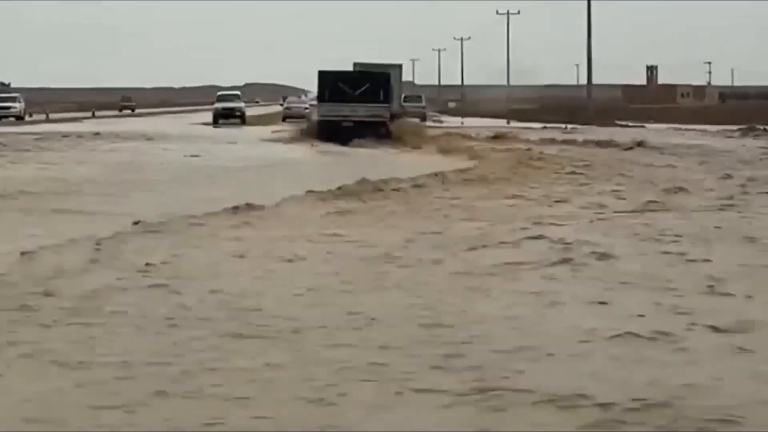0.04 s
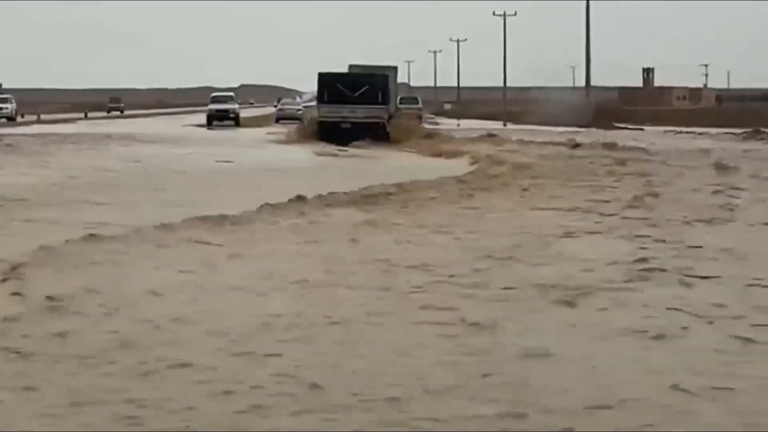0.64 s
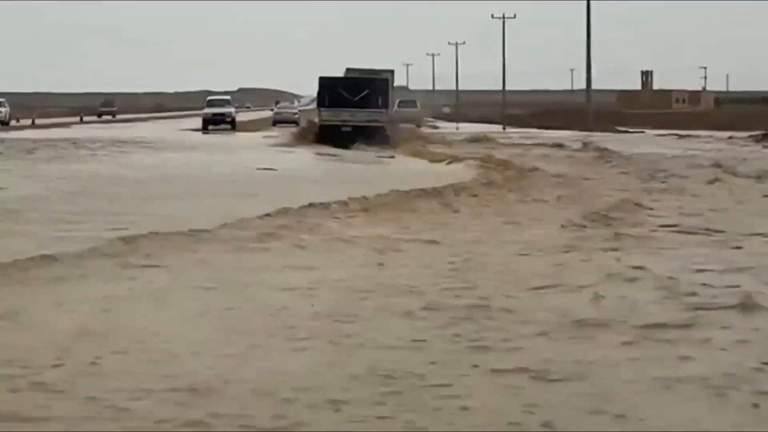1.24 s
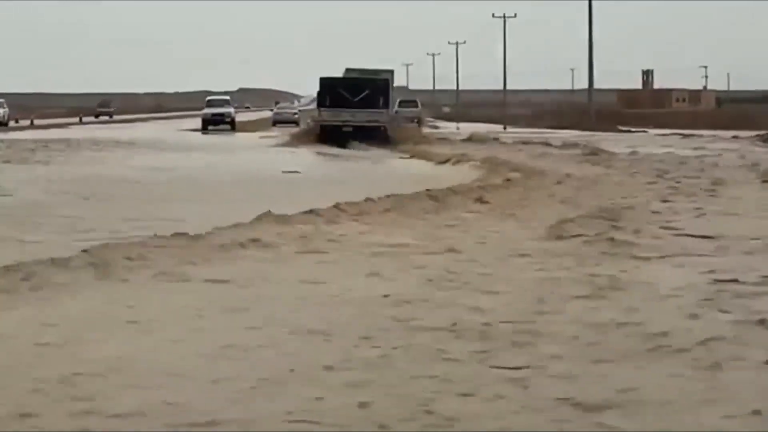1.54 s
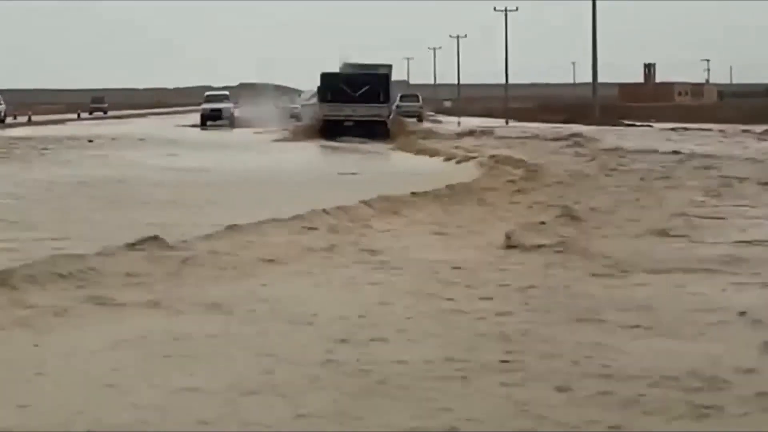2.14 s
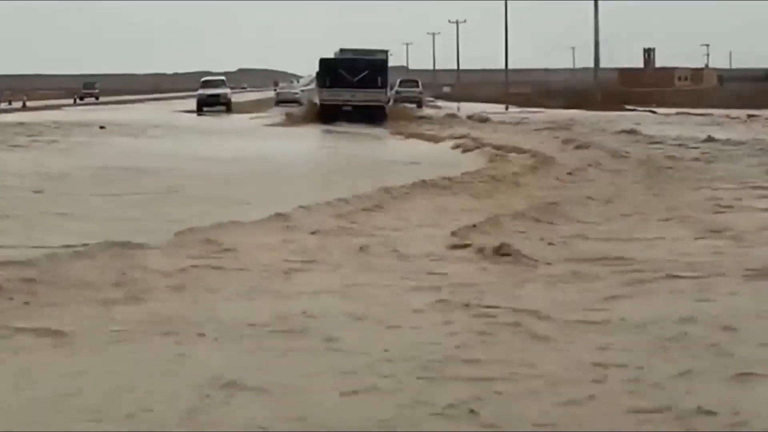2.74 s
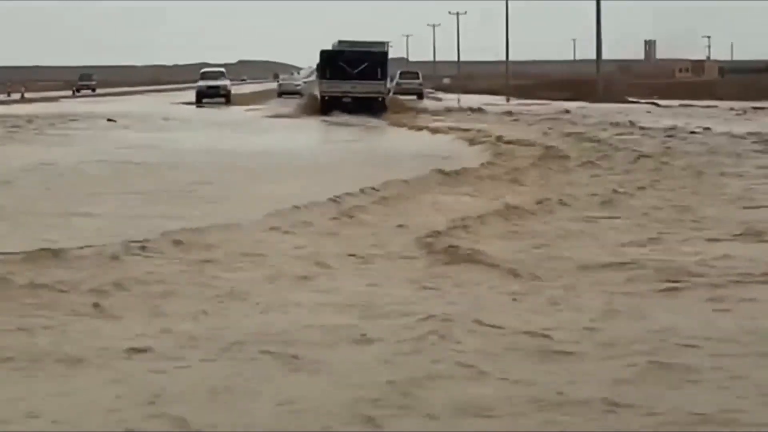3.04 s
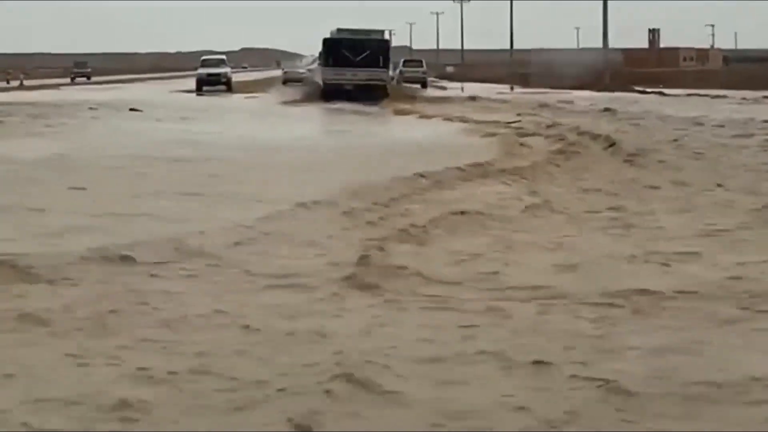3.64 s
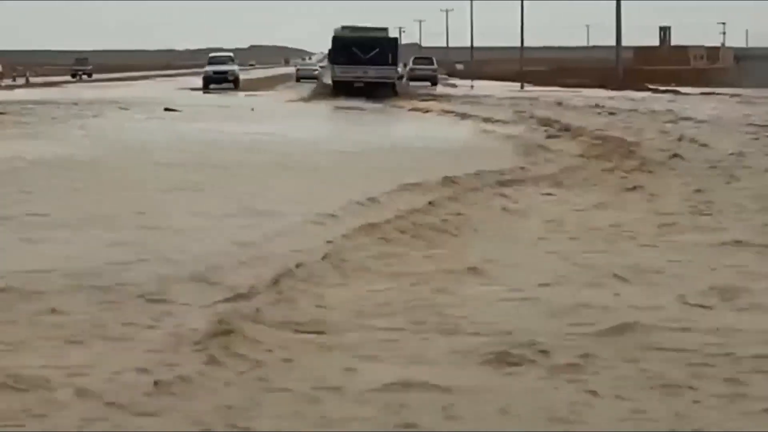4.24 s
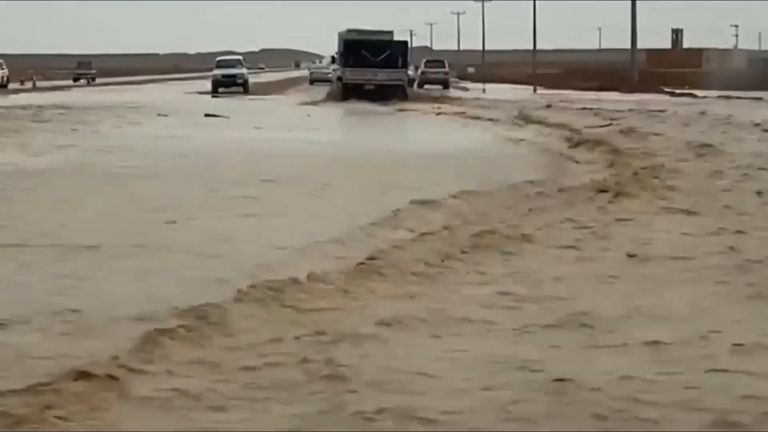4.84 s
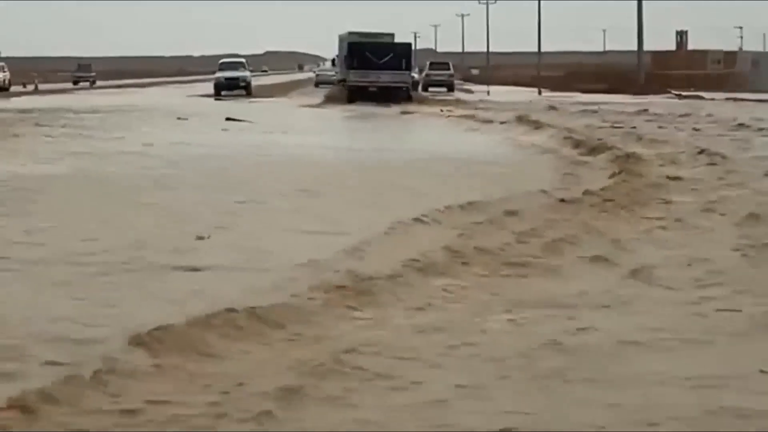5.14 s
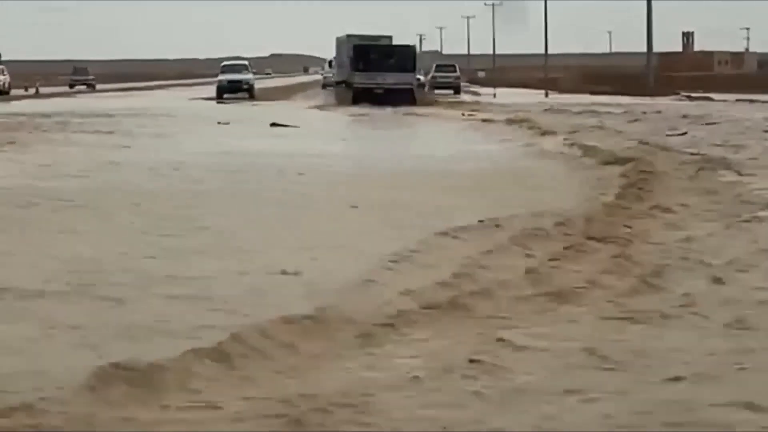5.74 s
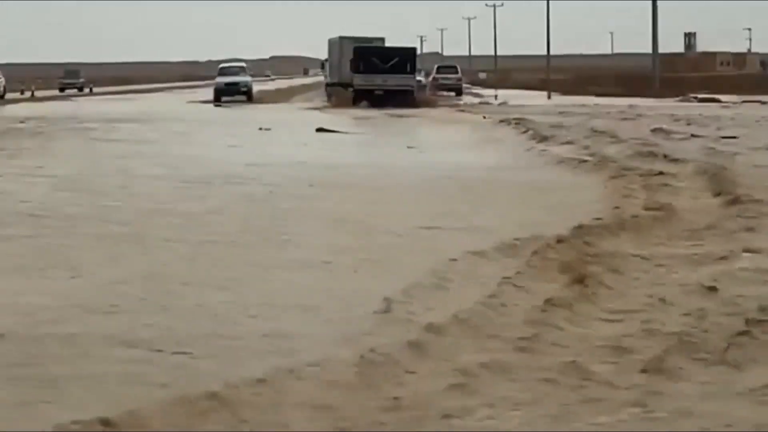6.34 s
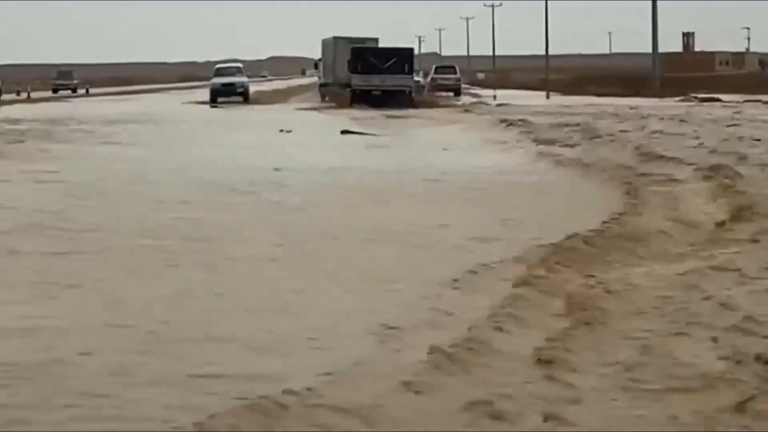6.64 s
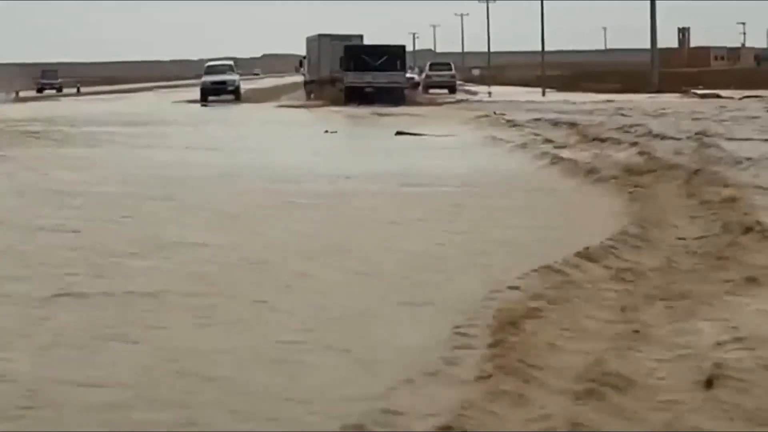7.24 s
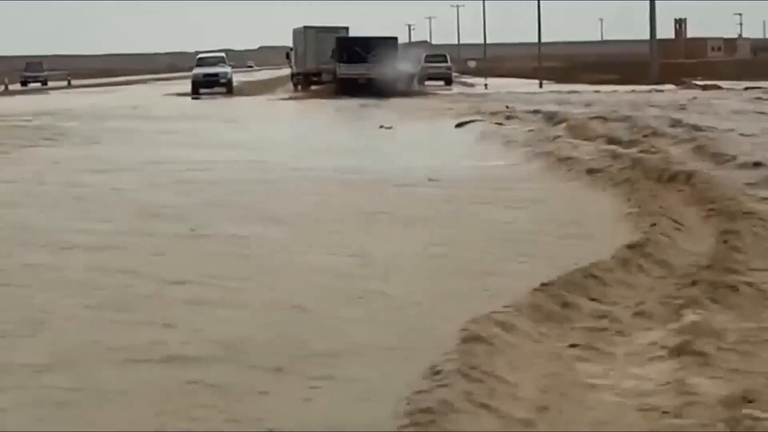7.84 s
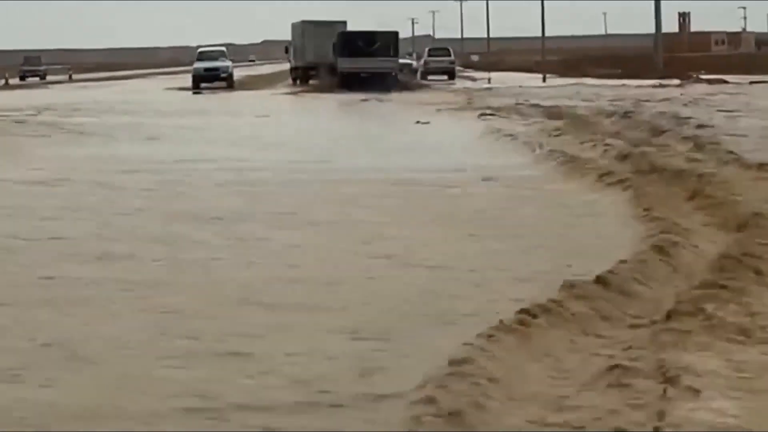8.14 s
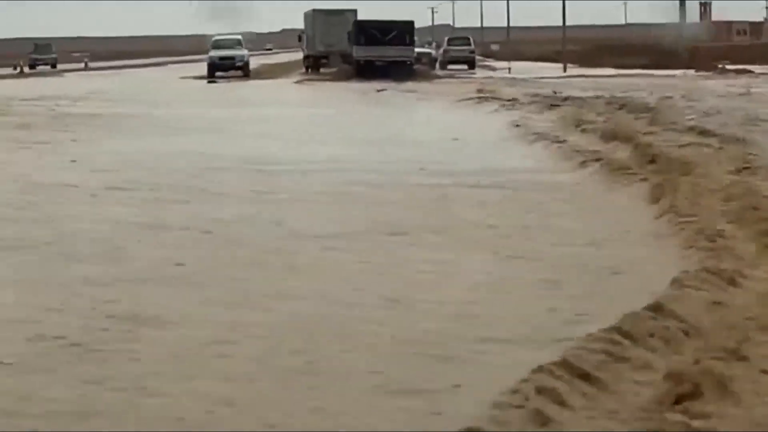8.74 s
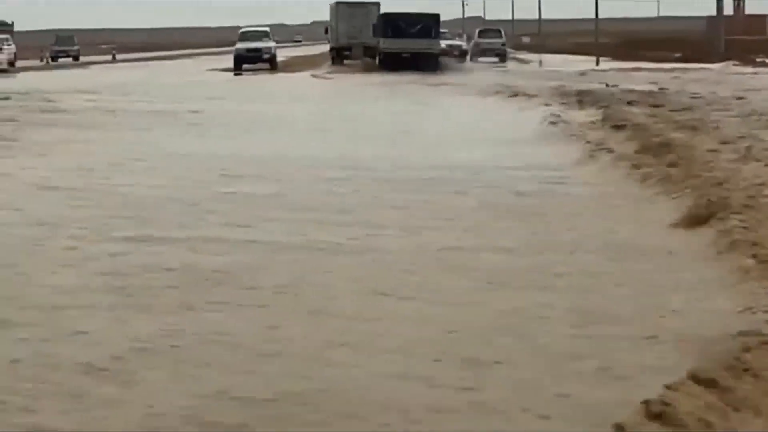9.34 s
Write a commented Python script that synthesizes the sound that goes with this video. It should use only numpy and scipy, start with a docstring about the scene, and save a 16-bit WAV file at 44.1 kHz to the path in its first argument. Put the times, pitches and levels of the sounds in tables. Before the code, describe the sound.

Rushing floodwater is heard throughout from the open window of a car wading along a road. The wash gurgles and fizzes across both sides, while a low engine drone and a heavy, buffeting wind rumble sit in the middle. It starts moderately loud, with deep puffs of wind on the microphone in the first two seconds and occasional light slaps of water. Brief low gulps sound right at the start and at about 3.6 and 4.1 seconds. From around 3.5 to 5.5 seconds the engine opens up, rising slightly in pitch, and the water and wind swell with it. The wave takes on a hollow, throaty tone from about 4.5 seconds. The strongest gusts hit between 5 and 7 seconds. The water then stays loud, with surges of spray and small splashes near 6.6, 7.4 and 8.5 seconds, continuing until the end just past 9 seconds.

```python
"""Rushing water and a low drone come through the open window of a car wading along a flooded road.
As the engine picks up speed, the bow wave grows louder: turbulence gives its wash, ringing bubbles
its gurgle and fizz, and single slaps of water its splashes. The engine sounds harmonics of its
firing rate. Wind buffets the window with a low rumble, the same in both ears."""
import sys
import numpy as np
from scipy import signal
from scipy.fft import rfft, irfft, next_fast_len
from scipy.io import wavfile
from scipy.ndimage import uniform_filter1d, map_coordinates

SR = 44100
rng = np.random.default_rng(int(sys.argv[2]) if len(sys.argv) > 2 else 0)


def wav_record(signal):
    """Record a signal, one row per channel, as 16-bit PCM in the file named by sys.argv[1]."""
    frames = np.transpose(np.atleast_2d(signal))
    bounded = np.clip(frames, -1, 1)
    # unit amplitude maps onto the largest positive 16-bit level
    quanta = np.round(bounded * 32767).astype(np.int16)
    wavfile.write(sys.argv[1], SR, quanta)


N = 413658

# How hard the car pushes the water. Each row: time in seconds, push in dB (0 at cruising speed).
WATER_PUSH = [(0, -6), (1.6, -4.7), (3.1, -2.5), (4.1, -1.87), (5.3, -0.06), (5.9, 0.5), (6.4, 0), (7.8, 0),
              (8.6, 0.2), (9.38, -0.75)]
# The bow wave slops over. Each row: peak time and width in seconds, wash and spray lifts in dB.
WAVE_SURGES = [(.4, 0.33, -0.5, 1), (1.38, 0.13, 0.5, 1.3), (2.15, 0.26, .5, 0.5), (2.8, .12, -1.3, 2),
               (3.5, 0.2, 1.5, 2), (4.1, .27, -0.5, .4), (4.68, 0.17, -0.5, 2.5), (5.38, 0.26, 1.5, 1.5),
               (5.83, 0.39, 0, 1.8), (6.62, 0.26, 0.7, 3.5), (7.4, 0.55, 0.1, 3), (8.03, 0.092, 0, 1.2),
               (8.52, 0.25, 1.5, 2), (8.88, 0.26, 0.8, 2.5), (9.25, .25, 0.5, .8)]
# Slaps of water. Each row: start and decay time in seconds, pitch in Hz, width in octaves, level in dB.
WATER_SLAPS = [(0.209, 0.087, 790, .25, -40), (0.672, .06, 1280, .3, -39), (1.308, 0.085, 1600, 0.55, -41),
               (2.068, 0.073, 1290, .3, -42), (2.818, 0.05, 1280, .3, -33), (3.148, 0.076, 794, 0.22, -35),
               (3.21, .07, 1000, .3, -40), (3.481, .12, 620, .7, -36), (3.928, .07, 2130, .3, -41),
               (4.155, 0.087, 2100, .3, -40.5), (4.44, 0.11, 358, .4, -29), (4.622, .07, 1290, 0.25, -34),
               (4.925, 0.072, 1300, .3, -39), (5.17, 0.068, 790, .3, -32), (5.691, 0.11, 290, 0.49, -29),
               (5.331, 0.11, 1310, .3, -34), (6.147, 0.12, 790, .25, -37), (6.344, 0.069, 780, .25, -31),
               (6.54, .14, 2100, 1.8, -33), (6.63, .09, 885, .5, -31), (6.74, 0.058, 1310, .3, -32),
               (7.301, 0.069, 1300, .3, -32), (7.319, 0.052, 2000, .4, -40), (7.48, 0.087, 2100, 1.1, -31),
               (8.007, .07, 1610, .6, -35), (8.52, .08, 2800, 1, -36), (8.96, .07, 566, 0.36, -33),
               (9.168, .06, 1600, 1.5, -33)]
# Trapped air. Each row: start in seconds, pitch in Hz, level in dB, seconds to fall by 60 dB.
AIR_POCKETS = [(.155, 349, -15, 0.07), (3.609, 175, -14, 0.12), (4.14, 175, -12, 0.15)]

# Noise spectra of water, car body and wind. Each row: frequency in Hz, relative density in dB.
WASH_SPECTRUM = [(120, -20), (260, -1), (400, 2.5), (520, -1), (620, -3), (1000, -6), (1600, -4.5),
                 (2200, -9.5), (3200, -14.5), (5500, -24), (15000, -58)]
CREST_SPECTRUM = [(900, -8), (1130, -8), (1250, 4.5), (1370, -1.5), (1550, -8), (2000, -36), (4000, -80)]
SPRAY_SPECTRUM = [(800, -11), (2000, 5.5), (3200, 1.1), (4300, -0.8), (5500, 0), (8000, -3), (11500, -5.5),
                  (15500, -10)]
FROTH_SPECTRUM = [(300, 0), (1500, 8), (6000, -26)]
CHURN_SPECTRUM = [(50, -43), (90, -4.5), (140, 1.5), (190, -4), (250, -7), (350, -12), (600, -26),
                  (2000, -45), (6000, -100)]
SHUDDER_SPECTRUM = [(30, -30), (60, -0.5), (75, 2), (125, 0.5), (170, -7.5), (260, -16), (700, -91)]
BUFFET_SPECTRUM = [(10, -30), (20, -10), (30, -6), (42, 1), (54, 1.5), (66, 7.5), (76, 6), (87, -3),
                   (110, -7.5), (160, -15), (250, -28.5), (400, -42), (900, -120)]
PUFF_SPECTRUM = [(12, -30), (27, -2), (36, -5), (46, -5), (65, -21), (150, -23), (260, -43), (700, -120)]

# Engine speed. Each row: time in seconds, firings per second.
FIRING_RATE = [(0, 24.9), (.85, 25.25), (1.4, 25.95), (2.4, 26.05), (2.8, 25.65), (3.42, 25.45),
               (3.8, 26.05), (4.35, 27.5), (5, 29.3), (5.5, 29.5), (6, 29.8), (6.8, 29.8), (7.5, 29.15),
               (8.1, 28.95), (9.38, 29.1)]
# Harmonics of the firing rate, from the first up. Each row: level in dB at light and at open throttle.
ORDER_LEVELS = [(-40, -25), (-28.5, -24), (-33, -23), (-31, -31), (-44, -36.5)]
# One engine order booms in the cabin. Each row: start and hold in seconds, order, lift in dB.
CABIN_BOOMS = [(1.1, 0.37, 2, 4.5), (1.9, .6, 4, 4.5), (2.55, 1.2, 2, 5), (3.6, 1, 4, 6),
               (4.15, 0.3, 3, 2.5), (4.7, 0.67, 2, 7.5), (5.4, 0.96, 2, 6), (6.7, .25, 2, 4),
               (7.25, 0.28, 2, 5.5), (7.7, 1.9, 4, 4.5), (8, 0.94, 2, 6.5), (8.6, 0.51, 3, 1.5)]
# Gusts at the window and puffs on the microphone. Each row: start and hold in seconds, level in dB.
WINDOW_GUSTS = [(0.167, 0.093, -20.5), (.72, 0.27, -23.5), (1.29, 0.11, -24), (1.864, 0.24, -19),
                (2.36, 0.15, -40), (2.642, .12, -20.5), (2.89, 0.087, -17), (3.253, 0.21, -18.5),
                (3.52, 0.14, -20), (3.93, 0.24, -18.5), (4.16, 0.29, -19), (4.7, 0.09, -22),
                (4.98, 0.11, -14.5), (5.287, 0.086, -14.5), (5.62, 0.17, -20), (5.95, 0.084, -11),
                (6.11, 0.15, -17.5), (6.307, 0.17, -23), (6.683, 0.22, -15), (7.33, 0.18, -21),
                (7.946, 0.17, -18), (8.432, 0.65, -18.5)]
MIC_PUFFS = [(.7, 0.37, -22.5), (1.28, 0.22, -31), (1.87, 0.16, -18.5)]

# Resonances of the window opening and cabin. Each row: centre and width in Hz, lift in dB.
CABIN_RESONANCES = [(410, 50, .7), (787, 105, 5.5), (1002, 55, 2.8), (1134, 110, -1.5), (1244, 70, 1.5),
                    (1345, 60, 1.8), (1600, 78, 1.5), (1710, 60, -1.5), (2015, 110, 2), (2110, 55, -1.8),
                    (2190, 65, 2), (2530, 99, 2), (3010, 70, 2), (3570, 110, 1), (3900, 80, 2),
                    (4850, 220, 1.5)]
# Likeness of the two microphone ports. Each row: frequency in Hz, coherence from 0 to 1.
PORT_COHERENCE = [(150, 1), (300, .94), (450, .91), (590, .8), (685, .42), (750, .82), (860, .76),
                  (930, .15), (1020, .42), (1160, .47), (1250, .76), (1380, .12), (1510, .6), (1660, .15),
                  (1850, .72), (2050, .88), (2900, .9), (3400, .99), (4200, .85), (5100, .97), (6000, .95),
                  (7000, 1)]
# Phase between the ports. Each row: frequency in Hz, lead of the left in radians.
PORT_LEAD = [(100, 0), (520, .4), (700, 1.5), (880, .55), (1100, 1.5), (1280, .9), (1470, 3), (1700, 4.3),
             (1900, 5.8), (2400, 6.85), (3400, 6.35), (4400, 7.1), (5100, 6.75), (6000, 7.95), (7300, 9.45),
             (8500, 10.4), (10300, 12.55), (11800, 13.85), (13000, 15.3), (14000, 15.8), (15500, 17.8)]
# Balance of the ports. Each row: frequency in Hz, left minus right in dB.
PORT_BALANCE = [(150, -1.5), (430, -0.2), (620, 2), (780, 2), (1400, 3), (1750, 3), (2200, 0)]


def bow_wave(push_db):
    """A breaking wave radiates by turbulence and bubble resonance: wash, hollow crest and fine spray."""
    wash_lift_db, spray_lift_db = surges()
    wash_db = -29.5 + 0.97 * push_db + wash_lift_db
    spray_db = -36.5 + 0.89 * push_db + spray_lift_db
    # the crest curls over with a throaty sound once the car is under way
    curl = amp(-50.5 + push_db) + amp(-45.5) * envelope(start=4.4, attack=0.26, hold=2.8, release=2.6)
    slosh = wobble(17)
    gurgle = bubbles(count=7000, low_hz=298.3, high_hz=1504, cycles=4.66,
                     spread_db=2.0, rise=0.039, samples=700)
    drops = bubbles(count=45000, low_hz=1510, high_hz=8230, cycles=1.2,
                    spread_db=3.5, rise=0.026, samples=48)
    wash = at_ports(turbulence(patchy_db=1.2) + amp(-11.5) * gurgle, WASH_SPECTRUM)
    crest = at_ports(turbulence(patchy_db=2.5), CREST_SPECTRUM)
    spray = at_ports(turbulence(patchy_db=1.58) + amp(-13) * drops, SPRAY_SPECTRUM)
    crest *= curl * amp(wash_lift_db + 1.6 * wobble(18))
    spray *= amp(spray_db + 0.19 * slosh + 0.66 * wobble(45))
    return amp(0.62 * slosh) * (amp(wash_db) * wash + crest) + spray


def surges():
    """Amplitude modulation: each slop of the wave shifts wash and spray by a bell curve in dB."""
    t = np.arange(N) / SR
    return sum(np.outer([wash_db, spray_db], np.exp(-(2 * (t - peak) / width) ** 2))
               for peak, width, wash_db, spray_db in WAVE_SURGES)


def splashes():
    """Impact excitation: each slap of water sets off a burst of froth and bubbles around one pitch."""
    attack_s = 0.018
    fizz = bubbles(count=6000, low_hz=350, high_hz=3880, cycles=4.2,
                   spread_db=1.5, rise=0.037, samples=900)
    froth = at_ports(turbulence(patchy_db=3) + fizz, FROTH_SPECTRUM)
    t = np.arange(SR // 2) / SR
    octaves = np.log2(np.fft.rfftfreq(len(t), 1 / SR) + 1)
    sound = np.zeros((2, N + len(t)))
    for start, decay, hz, width, db in WATER_SLAPS:
        piece = froth[:, rng.integers(N - len(t)):][:, :len(t)]
        band = np.exp(-2 * ((octaves - np.log2(hz)) / width) ** 2)
        burst = unit(irfft(rfft(piece) * band, len(t)))
        shape = np.clip(t / attack_s, 0, 1) * np.exp(-(t / decay) ** 2)
        sound[:, round(start * SR):][:, :len(t)] += amp(db) * shape * burst
    return sound[:, :N]


def churn(push_db):
    """Turbulent flow: water thrown about under the wheels gives a dull roar that grows with the push."""
    level_db = -24 + 1.67 * push_db + 1.13 * wobble(12)
    return amp(level_db) * at_ports(turbulence(patchy_db=0.8), CHURN_SPECTRUM)


def gulps():
    """A pocket of trapped air rings briefly as a damped oscillator."""
    sound = np.zeros(N)
    for start, hz, db, t60 in AIR_POCKETS:
        t = np.maximum(np.arange(N) / SR - start, 0)
        onset = 1 - np.exp(-t / 0.004)
        sound += amp(db - 60 * t / t60) * onset * np.sin(2 * np.pi * hz * t)
    return sound


def engine():
    """Periodic forcing: each firing is a dip of pressure, rich in harmonics, and shakes the car body."""
    opens_at_s, opening_s, boom_fade_s = 3.46, 0.92, 0.23
    throttle = np.clip((np.arange(N) / SR - opens_at_s) / opening_s, 0, 1)
    phase = 2 * np.pi * (np.cumsum(over_time(FIRING_RATE)) / SR + rng.random()) + .03 * wobble(3)
    load_db = 0.47 * wobble(4.8)
    shudder = unit(coloured_noise(SHUDDER_SPECTRUM) * amp(4.5 * np.cos(phase)))
    sound = amp(-31 + 4 * throttle) * shudder
    for order, (light_db, open_db) in enumerate(ORDER_LEVELS, 1):
        boom_db = sum(db * envelope(start, boom_fade_s, hold, boom_fade_s)
                      for start, hold, booming, db in CABIN_BOOMS if booming == order)
        level_db = light_db + throttle * (open_db - light_db) + boom_db + load_db
        sound -= amp(level_db) * np.sqrt(2) * np.cos(order * phase)
    return sound


def wind(push_db):
    """Buffeting: draught and gusts add in power at the window; deeper puffs strike the microphone."""
    def power(rows):
        return sum((amp(db) * envelope(start, attack=0.033, hold=hold, release=0.051)) ** 2
                   for start, hold, db in rows)

    draught = amp(-19 + 2.2 * push_db + 1.37 * wobble(11))
    buffet = np.sqrt(draught ** 2 + power(WINDOW_GUSTS)) * eddies(BUFFET_SPECTRUM)
    return buffet + np.sqrt(power(MIC_PUFFS)) * eddies(PUFF_SPECTRUM)


def eddies(spectrum):
    """Pressure fluctuations of about equal strength: noise divided by its running rms."""
    air = coloured_noise(spectrum)
    return air / np.sqrt(np.abs(uniform_filter1d(air ** 2, size=2600)) + 1e-6)


def turbulence(patchy_db):
    """Intermittency: two white noises with patches of random gain in time and frequency."""
    spectra = signal.stft(rng.standard_normal((2, N)), nperseg=512)[2]
    patches = uniform_filter1d(rng.standard_normal(spectra.shape[1:]), size=7, axis=0)
    patches = uniform_filter1d(patches, size=10, axis=1)
    return unit(signal.istft(spectra * amp(patchy_db * unit(patches)), nperseg=512)[1][:, :N])


def bubbles(count, low_hz, high_hz, cycles, spread_db, rise, samples):
    """Bubble resonance in two random clouds: each ring decays and climbs as it nears the surface."""
    clouds = []
    for _ in range(2):
        when, pitch, strength = rng.random((count, 3)).T[:, :, None]
        hz = low_hz * (high_hz / low_hz) ** pitch
        turns = hz * np.arange(samples) / SR
        age = turns / cycles
        # exponential distribution in dB: many faint ones, few loud ones
        gain = amp(-spread_db * np.log(np.maximum(strength, 1 / count ** .5))) * hz
        shape = np.exp(-age) * (1 - np.exp(-2 * turns))
        rings = gain * shape * np.sin(2 * np.pi * turns * (1 + rise * age))
        index = (when * N).astype(int) + np.arange(samples)
        clouds.append(unit(np.bincount(index.ravel(), rings.ravel(), N + samples)[:N]))
    return np.array(clouds)


def at_ports(pair, spectrum):
    """Partial coherence: two unrelated signals, coloured by the cabin, blend at the microphone ports."""
    def apart(hz):  # long waves reach both ports alike
        return hz ** 3 / (hz ** 3 + 170 ** 3)

    def mid_and_side(hz):
        cabin_db = sum(db * np.exp(-2 * ((hz - centre) / width) ** 2)
                       for centre, width, db in CABIN_RESONANCES)
        angle = apart(hz) * np.arccos(np.clip(along(PORT_COHERENCE, hz), -1, 1)) / 2
        return amp(along(spectrum, hz) + cabin_db) * [np.cos(angle), np.sin(angle)]

    def left_and_right(hz):
        share = np.array([[.5], [-.5]]) * apart(hz)
        return amp(share * along(PORT_BALANCE, hz)) * np.exp(1j * share * along(PORT_LEAD, hz))

    mid, side = filtered(pair, mid_and_side)
    return unit(filtered(np.array([mid + side, mid - side]), left_and_right))


def coloured_noise(spectrum):
    """Spectral shaping of white noise, at rms 1."""
    return unit(filtered(rng.standard_normal(N), lambda hz: amp(along(spectrum, hz))))


def filtered(x, response):
    """Linear filtering: the spectrum of x times a complex response of frequency."""
    size = next_fast_len(N + 8192)
    return irfft(rfft(x, size) * response(np.fft.rfftfreq(size, 1 / SR)), size)[..., :N]


def envelope(start, attack, hold, release):
    """A trapezoid, timed in seconds; the hold counts from the start."""
    t = np.arange(N) / SR - start
    return np.clip(t / attack, 0, 1) * np.clip(1 - (t - hold) / release, 0, 1)


def wobble(rate):
    """Smooth random modulation, rate knots a second."""
    return map_coordinates(rng.standard_normal(4096), [np.arange(N) * rate / SR], mode="wrap")


def along(points, hz):
    """Interpolation of (Hz, value) points on a log frequency axis."""
    point_hz, values = np.transpose(points)
    return np.interp(np.log(hz + 1), np.log(point_hz + 1), values)


def over_time(points):
    """Interpolation of (seconds, value) points at every sample."""
    return np.interp(np.arange(N) / SR, *np.transpose(points))


def amp(db):
    """Decibels to gain."""
    return 10 ** (np.asarray(db) / 20)


def unit(x):
    """Normalisation to rms 1."""
    return x / np.sqrt(np.mean(x ** 2) + 1e-20)


def scene():
    """Superposition: water all around; gulps, engine and wind in the middle."""
    push_db = over_time(WATER_PUSH)
    return bow_wave(push_db) + splashes() + churn(push_db) + gulps() + engine() + wind(push_db)


def record(dry):
    """Soft saturation rounds off the largest swings, and a band limit removes the highest treble."""
    ceiling, top_hz = .92, 15650
    rounded = dry / (1 + np.abs(dry / ceiling) ** 10) ** (1 / 10)
    return filtered(rounded, lambda hz: hz < top_hz)


dry = scene()
out = record(dry)
wav_record(out)
```